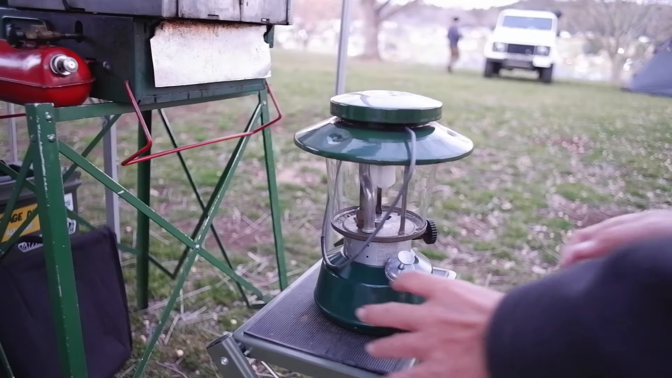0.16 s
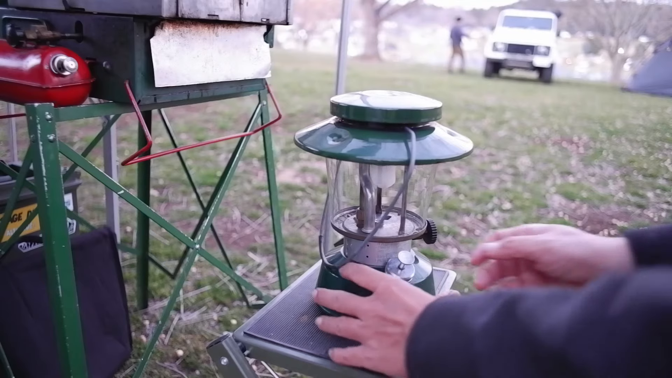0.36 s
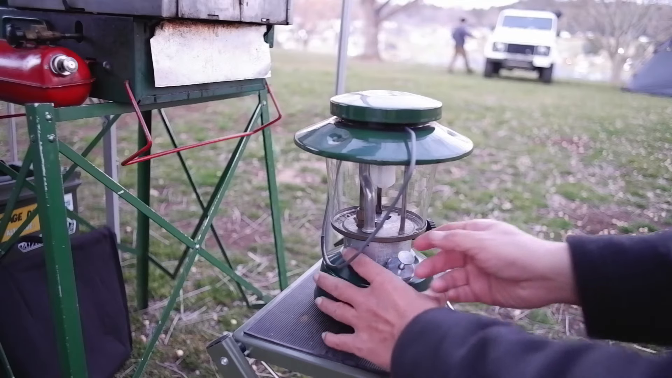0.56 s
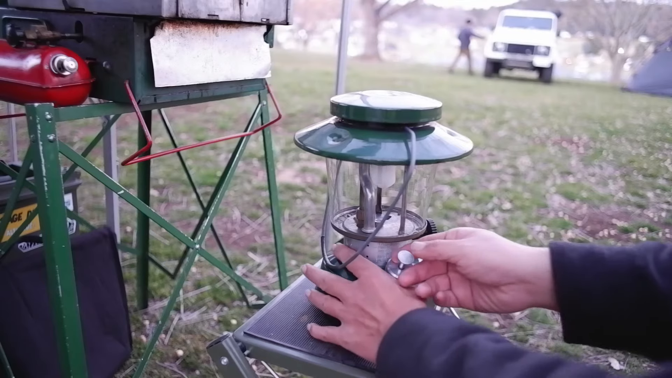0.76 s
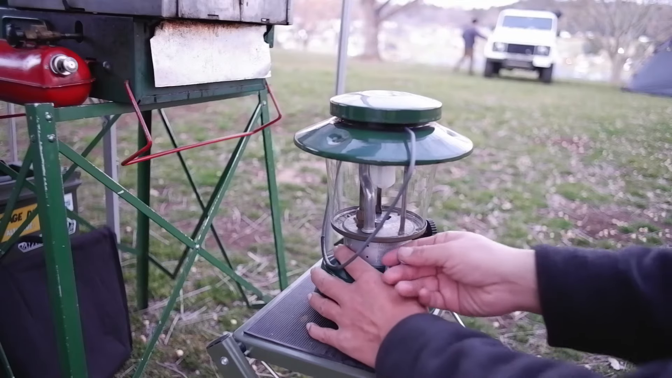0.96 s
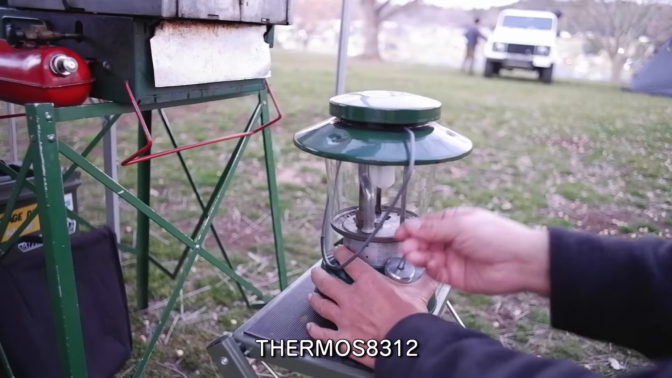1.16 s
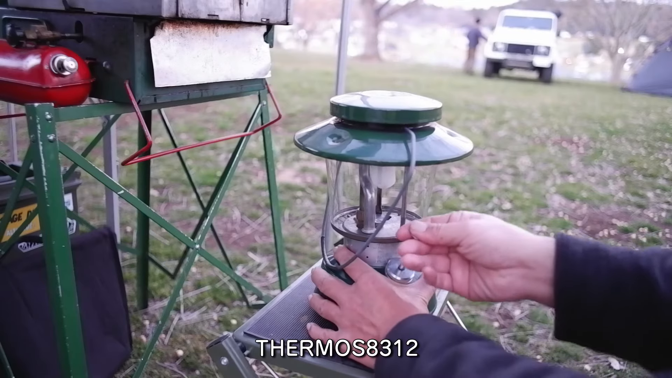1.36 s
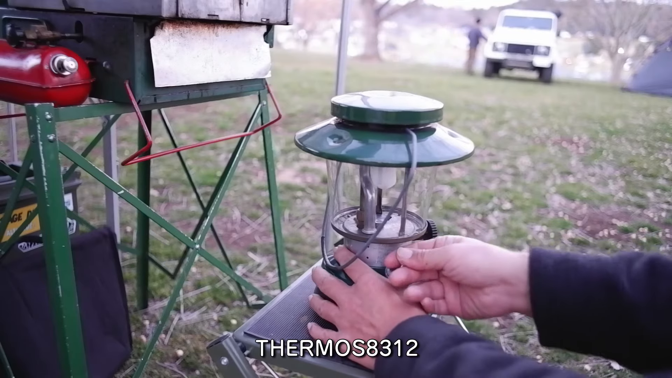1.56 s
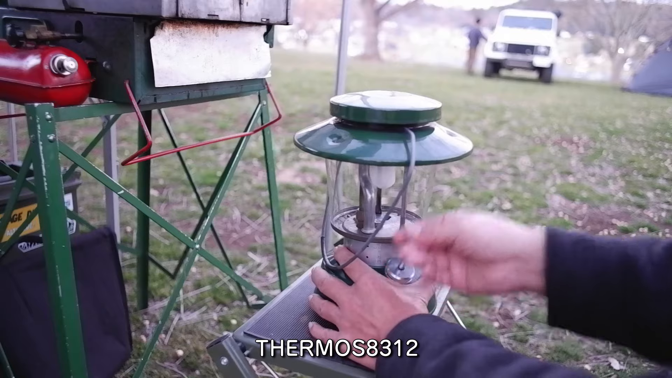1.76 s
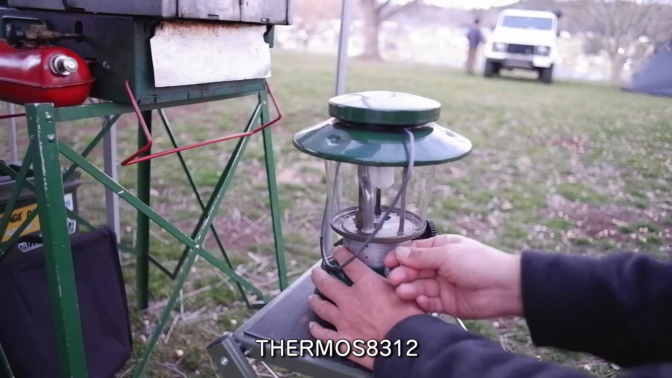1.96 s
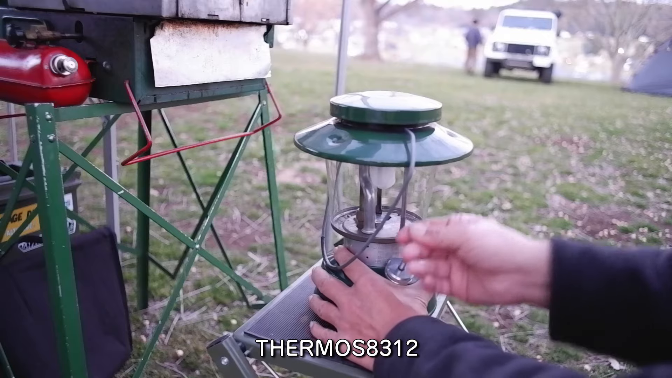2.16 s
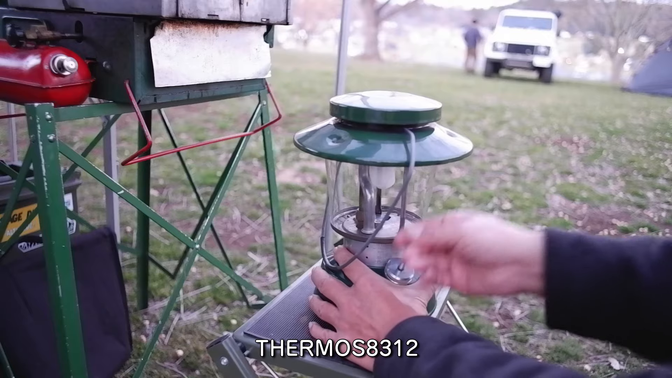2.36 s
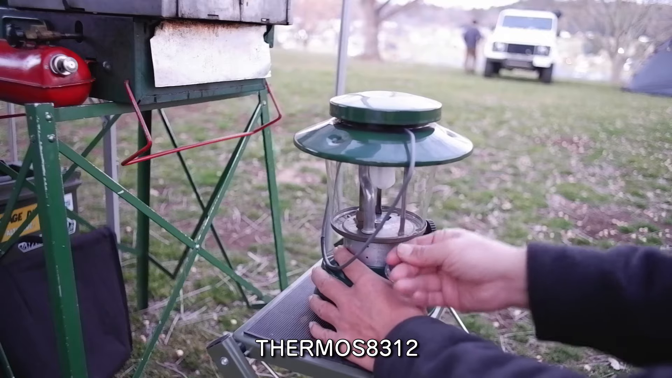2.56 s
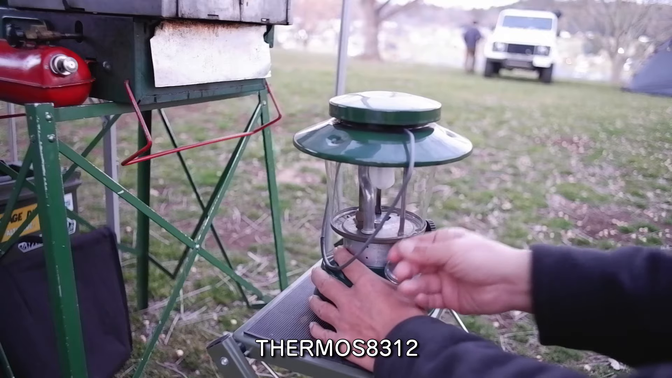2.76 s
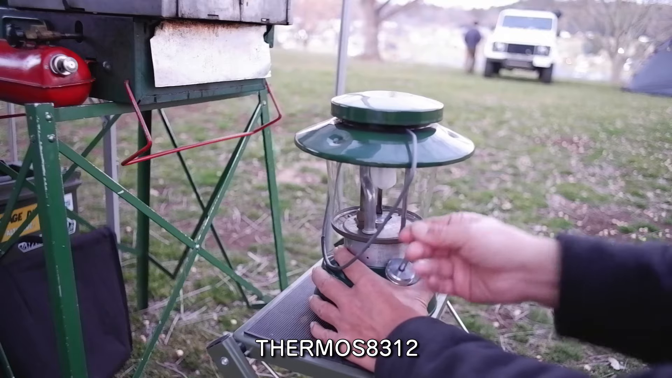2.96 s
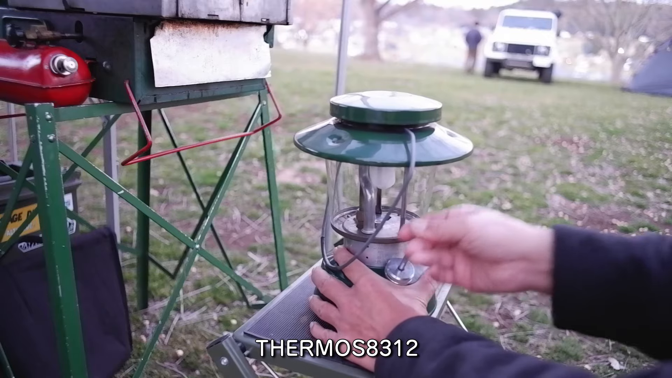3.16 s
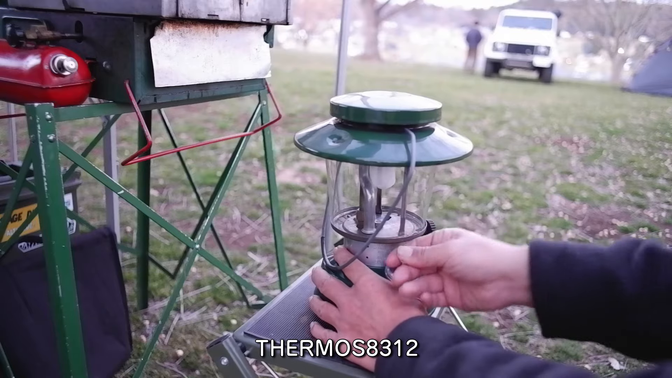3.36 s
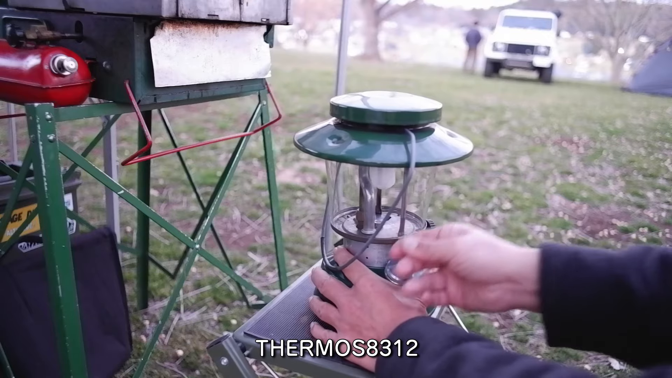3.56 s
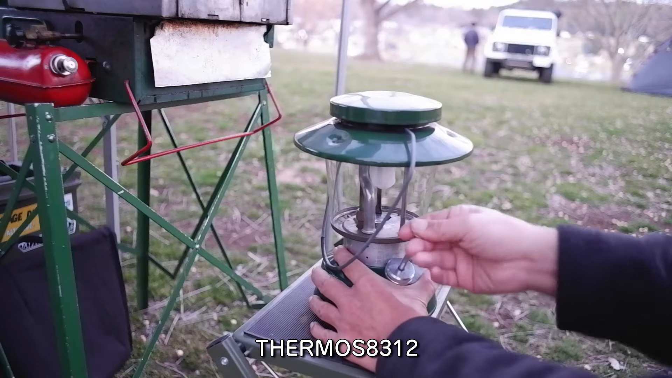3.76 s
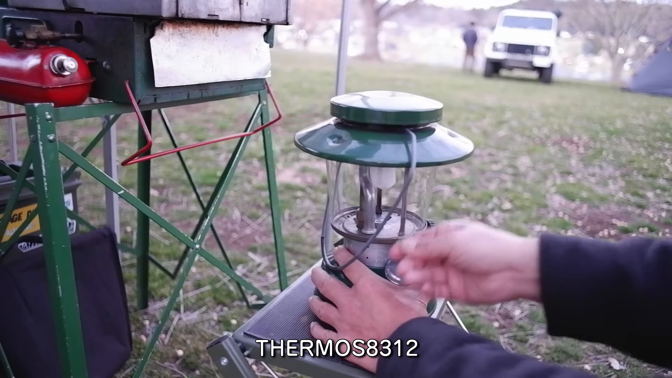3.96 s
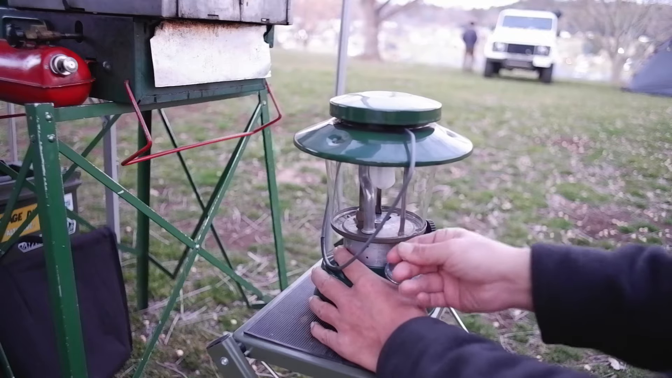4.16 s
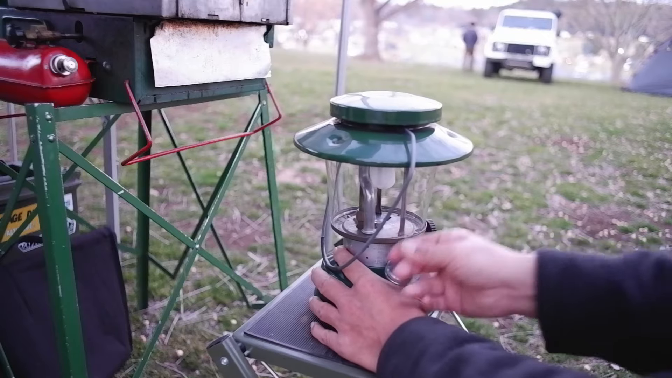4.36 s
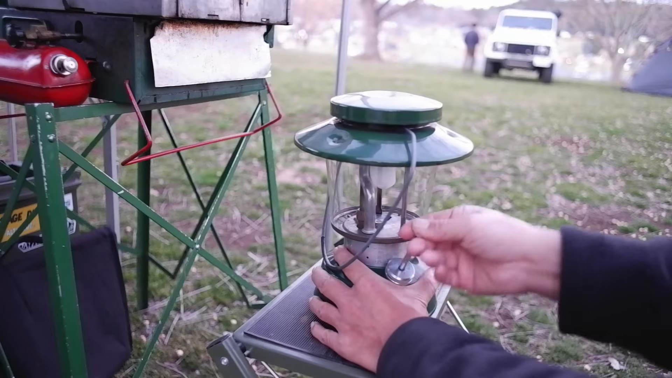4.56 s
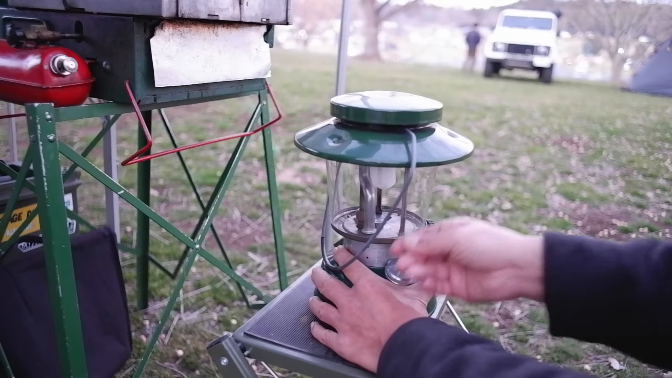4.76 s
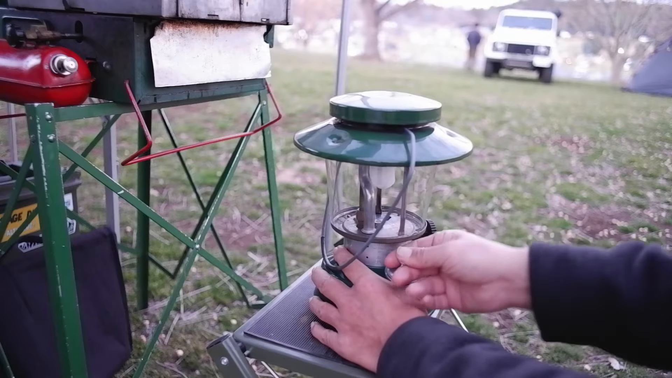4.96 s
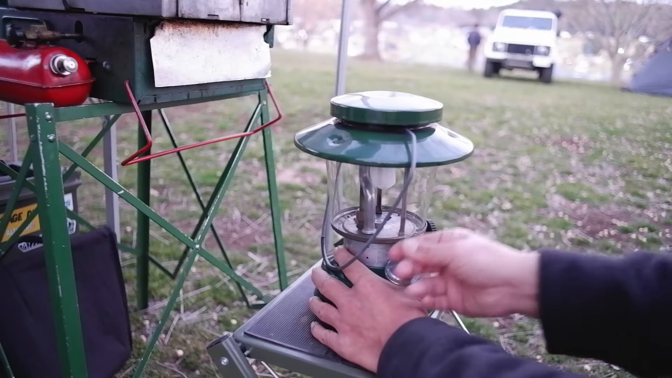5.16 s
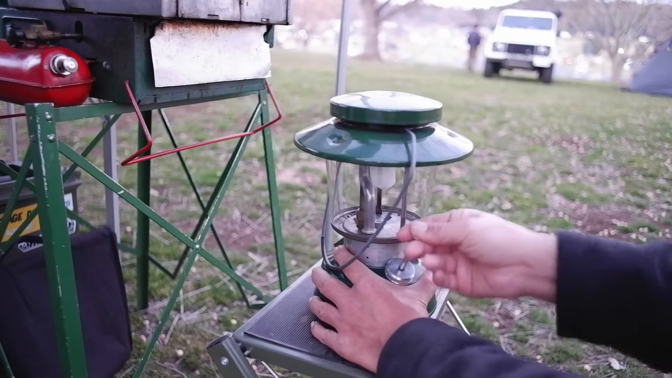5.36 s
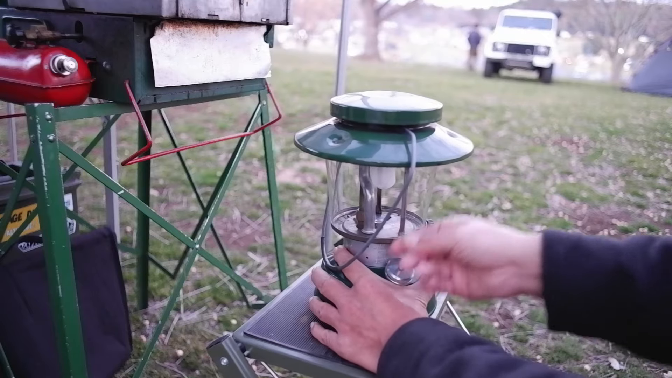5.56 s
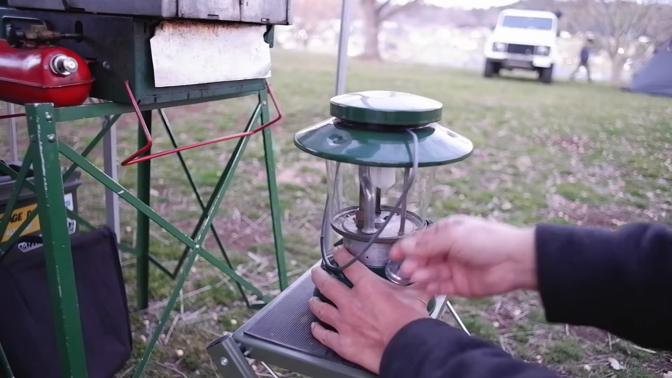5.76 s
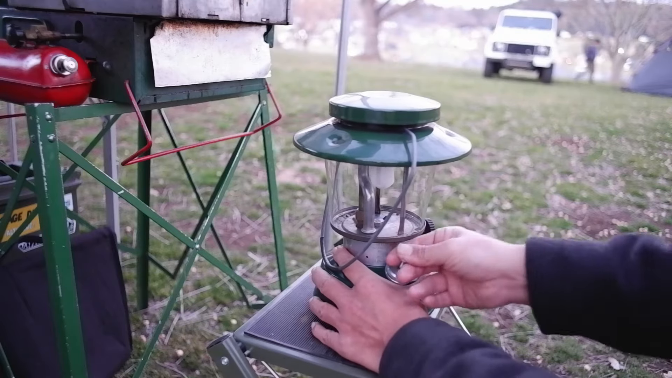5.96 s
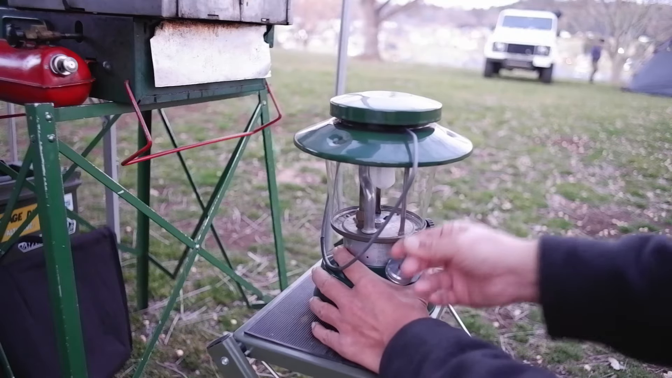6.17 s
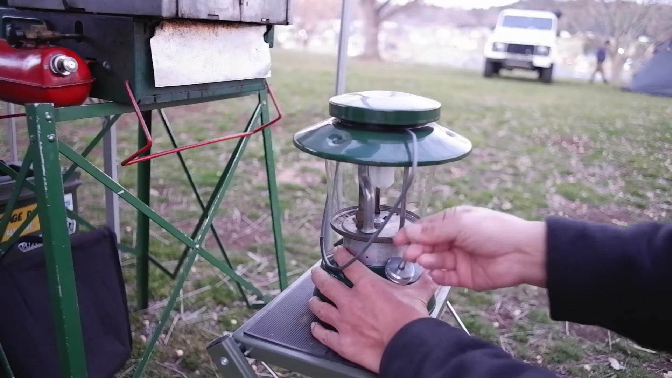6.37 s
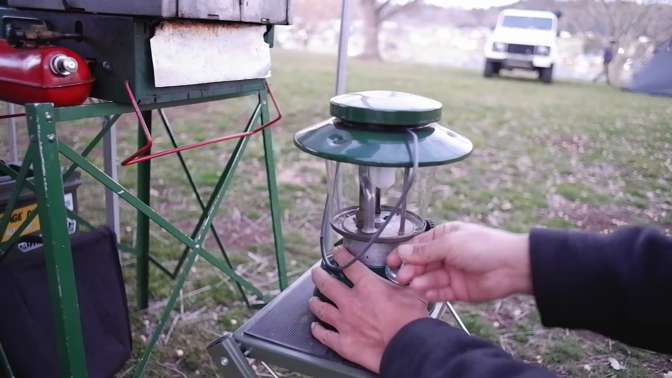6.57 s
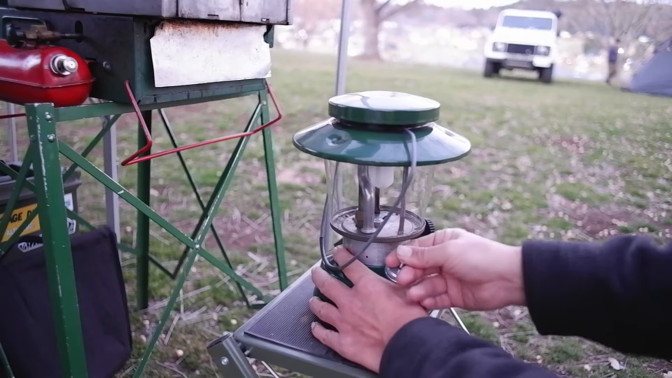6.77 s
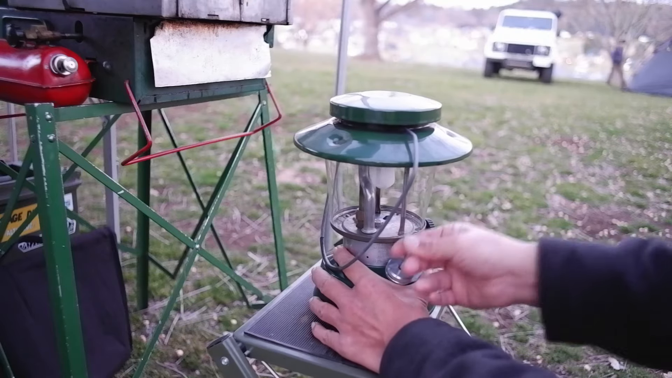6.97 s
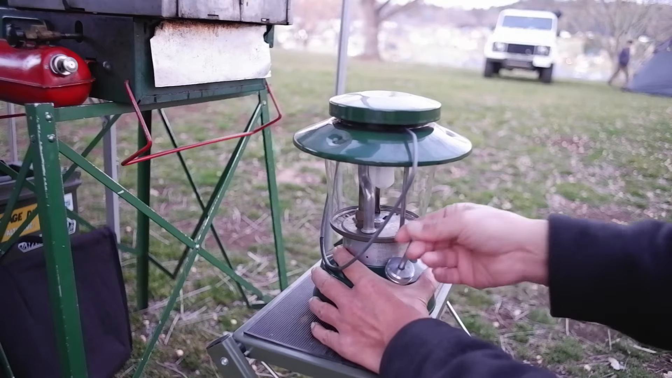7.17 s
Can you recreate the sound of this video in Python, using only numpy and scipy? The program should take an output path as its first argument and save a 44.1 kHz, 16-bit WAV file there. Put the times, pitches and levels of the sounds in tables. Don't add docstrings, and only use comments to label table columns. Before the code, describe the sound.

After soft fumbling and a bright metal tap, a small plunger pump squeaks rapidly about four times a second, rattling and ringing outdoors.

```python
import sys
import numpy as np
from scipy import signal
from scipy.fft import rfft, irfft, next_fast_len
from scipy.io import wavfile
from scipy.ndimage import uniform_filter1d, map_coordinates

SR = 44100
rng = np.random.default_rng(int(sys.argv[2]) if len(sys.argv) > 2 else 0)


def int16_out(signal):
    q = np.round(np.clip(np.atleast_2d(signal).T, -1, 1) * 32767)
    wavfile.write(sys.argv[1], SR, q.astype(np.int16))


def to_linear_factor(level_db):
    exponent = np.asarray(level_db, float) / 20
    return 10 ** exponent


N = 318133


def unit(x):
    return x / np.sqrt(np.mean(x ** 2) + 1e-20)


def at(points, t):
    return np.interp(t, *np.transpose(points))


def along(points, hz):
    f, v = np.transpose(points)
    return np.interp(np.log(hz + 1), np.log(f + 1), v)


def wobble(rate):
    return map_coordinates(rng.standard_normal(int(N * rate / SR) + 4), [np.arange(N) * rate / SR])


def filtered(x, response):
    m = next_fast_len(N + SR // 2)
    return irfft(rfft(x, m) * response(np.fft.rfftfreq(m, 1 / SR)), m)[..., :N]


def spread(pair, alike):
    def turn(hz):
        return np.arccos(np.clip(along(alike, hz), -1, 1)) / 2

    mid, side = filtered(pair, lambda hz: np.array([np.cos(turn(hz)), np.sin(turn(hz))]))
    return np.array([mid + side, mid - side])


def add(track, s, sound):
    part = track[..., round(s * SR):][..., :sound.shape[-1]]
    part += sound[..., :part.shape[-1]]


def fade(t, rise, t60):
    return (1 - np.exp(-(t / rise) ** 2)) * to_linear_factor(-60 * t / t60)


def glide_phase(hz):
    return 2 * np.pi * np.cumsum(hz) / SR + rng.uniform(0, 2 * np.pi)


def ring(modes, t, rise, scatter_db, flutter_db):
    hz, db, t60 = np.transpose(modes)[:, :, None]
    luck = rng.standard_normal((4, len(modes), 1))
    flutter = flutter_db * np.sin(2 * np.pi * 9 * np.exp(.5 * luck[2]) * t + 3 * luck[3])
    strength = to_linear_factor(db + scatter_db * luck[0] + flutter) * fade(t, rise, t60)
    return np.sum(strength * np.sin(2 * np.pi * hz * t + 3 * luck[1]), axis=0)


def swept(slips, modes, t):
    wall = np.zeros(len(t))
    for hz, db, t60 in modes:
        wall += to_linear_factor(db + 1.1 * rng.standard_normal() - 60 * t / t60) * np.sin(2 * np.pi * hz * t)
    voiced = signal.fftconvolve(slips, wall)[:len(t)]
    return voiced / np.abs(voiced).max()


# pitch_hz, level_db per Hz
FIELD_HUSH = [(60, -28), (110, -2), (320, -3), (500, -8.5), (1400, -14.5), (2400, -17.5), (3600, -21),
              (4600, -30), (9000, -30), (16300, -27.5)]
# pitch_hz, likeness 0-1
FIELD_LIKENESS = [(100, .4), (300, .6), (950, .8), (3800, .5), (15000, .1)]
# time_s, level_db
BREEZE_LEVEL = [(0, -78), (.6, -79), (1.2, -75), (1.6, -78), (2.2, -76), (3, -75), (3.6, -73.5), (4.3, -73),
                (4.7, -70), (5.2, -68.5), (5.7, -71.5), (6.1, -79), (6.4, -70.5), (6.8, -76), (7.2, -72)]
# start_s, level_db
SLEEVE_PUFFS = [
    (.305, -60),
    (.73, -65),
    (1.18, -61),
    (1.27, -75),
]
# pitch_hz, likeness 0-1
PUFF_LIKENESS = [(30, .3), (150, .4)]


def field():
    z = signal.stft(rng.standard_normal((2, N)), nperseg=512)[2]
    patches = uniform_filter1d(uniform_filter1d(rng.standard_normal(z.shape[1:]), 6, 0), 14, 1)
    pair = signal.istft(z * to_linear_factor(1.2 * unit(patches)), nperseg=512)[1][:, :N]
    distant = filtered(pair, lambda f: to_linear_factor(along(FIELD_HUSH, f)) / (1 + (140 / (f + 1)) ** 4))
    hush = unit(spread(distant, FIELD_LIKENESS))
    puff = filtered(rng.standard_normal((2, N)), lambda f: (f / 110) / (1 + (f / 150) ** 3.4))
    level = to_linear_factor(at(BREEZE_LEVEL, np.arange(N) / SR) + 5.4 * wobble(4.8))
    t = np.arange(SR // 4) / SR
    jolts = [(s, 0.5 * table_db - 39) for s, _, _, table_db, _ in STROKES]
    for s, db in SLEEVE_PUFFS + jolts:
        add(level, s, to_linear_factor(db) * fade(t, 0.0013, 0.25))
    return to_linear_factor(-64.5) * hush + level * unit(spread(puff, PUFF_LIKENESS))


# time_s, level_db
RUB_PRESSURE = [(0, -58.5), (.26, -71), (.68, -64.5), (1.65, -70), (1.95, -52), (2.1, -46.5), (3.2, -49.5),
                (3.5, -49.5), (5.3, -51), (5.6, -51), (5.9, -48), (7.2, -49)]


def rubbing():
    t, blows = np.arange(N) / SR, np.transpose(STROKES)[0]
    last_blow = blows[np.maximum(np.searchsorted(blows, t) - 1, 0)]
    since = np.where(t > blows[0], t - last_blow, 0)
    ease_db_per_s = 15
    return at(RUB_PRESSURE, t) - ease_db_per_s * since + 4 * wobble(25) + 0.96 * wobble(140)


# start_s, level_db, pitch_hz of the touched part, treble_db over the level
FINGERS = [(0.026, -42.5, 1243, -12), (0.055, -61, 2600, 9), (0.3038, -54, 1084, -28),
           (0.414, -53, 1340, -28), (0.487, -42, 1680, -15), (0.521, -45, 1950, -14),
           (0.542, -43, 1720, -20), (0.5545, -44, 3300, -4.5), (0.561, -56, 955, -20),
           (0.575, -53, 940, -25), (0.611, -44, 2520, -7), (0.855, -39, 1610, -7),
           (0.9184, -48, 1070, -25.5), (0.99, -55, 1310, -11), (1.005, -54, 3780, -13),
           (1.03, -53, 2100, -9), (1.048, -55, 3480, -14), (1.1562, -52, 1260, -23), (1.24, -54, 1160, 0.5),
           (1.261, -39.5, 3790, -7), (1.273, -58, 3600, -14), (1.284, -49, 4240, -7),
           (1.31, -47.5, 1150, -3), (1.3455, -48, 2026, 4), (1.36, -42.5, 3800, 6.5),
           (1.372, -49, 4400, -12), (1.398, -61, 4280, -11), (1.41, -57, 3600, -15),
           (1.3855, -51, 3890, 3.5126), (1.4494, -57, 1400, -4), (1.5167, -55.5, 1570, 1.5)]
# start_s, level_db, pitch_hz, treble_db
CAP_TAP = [
    (0.6933, -15, 6420, 0.04),
]
# start_s, level_db, pitch_hz, treble_db
ROD_TICKS = [(1.8696, -58, 1166, 8), (1.9163, -40, 4360, -3), (1.9304, -41.5, 5540, -1),
             (1.953, -33.5, 4150, -2), (1.9655, -34, 4500, 2), (2.2623, -30, 3990, -2.5),
             (2.526, -41, 6000, 4), (2.5526, -30.5, 3480, -10), (2.787, -54, 1250, 16),
             (2.818, -27, 4350, 1.5), (2.859, -31, 2450, -4.5), (3.083, -29, 1540, -1),
             (3.124, -27, 6440, -10), (3.34, -35.5, 3780, 0.5), (3.3788, -34, 3000, -5),
             (3.6, -38, 4040, -6), (3.628, -36.5, 2980, 0), (3.664, -39.5, 1720, -27),
             (3.928, -36.5, 4120, 0.5), (4.205, -44, 3020, 3.5), (4.44, -38.5, 3650, -3),
             (4.718, -38, 3830, -1), (4.986, -41, 3670, 3), (5.2187, -38.5, 4250, 2),
             (5.252, -43, 3860, 9.5), (5.443, -59, 5960, 5), (5.487, -45.5, 4100, 3),
             (5.546, -54, 5800, 4.5), (6.0005, -36, 2970, 4), (6.241, -45, 4100, 6),
             (6.274, -39.5, 4030, 6), (6.769, -42, 3960, 7)]
# start_s, level_db, treble_db over the level,
# tank_knock_db
REBOUNDS = [(1.725, -9.5, -3.5, -9), (2.0984, -10, -2.5, -7), (2.3905, -24, -10, -19),
            (3.198, -28.5, 2, -35), (3.749, -39, -7, -40), (4.022, -30, 9, -28), (4.0503, -26.5, 0.5, -40),
            (4.563, -15.5, -4.5, -25), (5.0881, -13.5, 3, -6.5), (5.356, -23.5, 4, -36),
            (5.3883, -32.5, 6, -51), (5.6323, -14.5, -1, -25), (5.813, -25, -5, -20),
            (5.8281, -15, -1.5, -20), (6.079, -32, -3.5, -27), (6.099, -30, -8, -31),
            (6.379, -11, 0.5, -12), (6.428, -32, 4.5, -38), (6.6474, -10.5, -1, -11),
            (6.8985, -19.5, 5, -29), (6.907, -34, -14, -16.5), (6.954, -33.5, 9, -45),
            (6.973, -25.5, 1.5, -44), (7.177, -24, -2, -20)]
# start_s, level_db
LEAD_INS = [(2.633, -14), (3.162, -14.5), (3.702, -27), (4.247, -20), (5.302, -34), (5.767, -22.5),
            (6.035, -21.5), (6.312, -24), (6.574, -29.5), (6.593, -32), (6.829, -39), (6.846, -34.5),
            (7.079, -31.5), (7.131, -26)]


def contacts():
    rows = [(s, db - 14.5, db, db + treble_db, .0006, 0.069) for s, db, treble_db, _ in REBOUNDS]
    rows += [(s, db - 3.5, db, db, 0.012, 0.16) for s, db in LEAD_INS]
    low_hz, middle_hz = 1400, 2600
    low_db_per_octave, middle_db_per_octave = 6.5, -1
    for ticks, t60 in ((FINGERS, 0.13), (CAP_TAP, 0.15), (ROD_TICKS, 0.12)):
        for s, db, hz, treble_db in ticks:
            low_db = db - low_db_per_octave * max(np.log2(hz / low_hz), 0)
            middle_db = db - middle_db_per_octave * max(np.log2(middle_hz / hz), 0)
            rows.append((s, low_db, middle_db, db + treble_db, .001, t60))
    return rows


# pitch_hz, width_hz, level_db
LANTERN_PEAKS = [(1305, 224, 1.5), (1720, 34, 14), (1950, 6, -11.5), (2333, 330, 1.5), (2818, 35, -5.5),
                 (3480, 48, 13.5), (3723, 105, -8.5), (4156, 28.6, 12), (4800, 9.2, -5), (5150, 340, -1),
                 (5796, 63, -2.5), (6070, 140, 5), (6365, 36, -2), (6700, 30, -12), (7460, 38, -16),
                 (8120, 93, -9)]


def lantern_body(hz):
    response = .5
    for k, (centre, width, db) in enumerate(LANTERN_PEAKS):
        damped = 1j * hz * width
        response = response + (-1) ** k * 0.8 * to_linear_factor(0.48 * db) * damped / (centre ** 2 - hz ** 2 + damped)
    return response


# pitch_hz, level_db per Hz
RATTLE_COLOUR = [(200, -29), (300, -18.5), (500, 4.5), (660, 2.5), (1080, 1.5), (1270, 1), (1470, -3.5),
                 (2210, -5.5), (3580, -10), (4460, -11.5), (6320, -9), (15400, -37), (16300, -75)]
# rise_s, t60_s, treble_db, top_db, squeak_length_factor
SHAKES = [(.003, 0.21, -4.5, -3.5, 1.21), (.004, 0.11, -6.5, -6, 1.3), (.004, 0.14, -2.5, -7, 0.944),
          (.005, 0.095, -2, 0, 1.1), (.004, 0.13, -3, -3, 1.13), (.006, 0.069, -2.5, -2, 1.03),
          (.004, 0.11, -0.5, -3, 1.024), (.005, .12, -2, -2, 1.074), (.004, .13, 0.5, -5, 1.098),
          (.005, 0.097, 0, -0.5, 1.004), (.004, 0.16, 1.5, -4.5, 1.043), (.005, .12, 0.5, -1, 1.034),
          (.005, 0.12, -1.5, -4, 1), (.005, 0.11, -0.5, -3, 0.932), (.005, .12, -0.5, -4.5, 1),
          (.007, 0.14, 1, -6, 1.2), (.007, .13, -2, -2.5, 1.3), (.007, 0.14, -2, -7, 1.2),
          (.007, 0.097, 0, -6, 1), (.007, 0.15, -2, -2, 1.1), (.007, 0.11, -1, -3, 0.91)]
LINGER = [
    [-28],
    [-29],
    [-33],
    [-38],
]
RUB = [
    [-12],
    [-10.5],
    [-19],
    [-14],
]


def rattle():
    drive, t = np.zeros((4, N)), np.arange(SR // 4) / SR
    lasting = np.array([[1.15], [1.02], [.95], [.72]])
    rises = np.array([[1.2], [.95], [1.15], [.9]])
    for (s, _, db, *_), (rise, t60, treble_db, top_db, _), (*_, low_db) in zip(STROKES, SHAKES, HOLDS):
        linger = to_linear_factor(LINGER) * fade(t, 0.035, 0.28 * lasting)
        registers_db = np.array([[low_db], [1.5], [treble_db], [top_db]])
        add(drive, s + 0.000099, to_linear_factor(db + registers_db) * (fade(t, rise * rises, t60 * lasting) + linger))
        add(drive, s - .005, to_linear_factor(db - 32 + 1.8 * s) * fade(t, .003, .035 * lasting))
    for s, *levels_db, rise, t60 in contacts():
        registers_db = np.append(levels_db, levels_db[-1] - 0.5)[:, None]
        snap = to_linear_factor(3) * fade(t, rise, .012)
        add(drive, s - .0008, to_linear_factor(registers_db - 12) * (fade(t, rise, t60 * lasting) + snap))
    drive = np.hypot(drive, to_linear_factor(rubbing() + np.array(RUB)))

    chatter = to_linear_factor(.7 * wobble(180) + 2.2 * wobble(900))
    noise = rng.standard_normal((2, N)) * unit(chatter)

    def registers(f):
        low = 1 / (1 + (f / 2000) ** 6)
        high = 1 - 1 / (1 + (f / 5000) ** 8)
        top = 1 - 1 / (1 + (f / 8600) ** 10)
        return np.array([low, 1 - low - high, high - top, top])[:, None] * to_linear_factor(along(RATTLE_COLOUR, f))

    sources = filtered(noise, registers)
    sources = sources / sources.std(axis=(1, 2))[[0, 1, 2, 2], None, None]
    out = np.zeros((2, N))
    for gain, source, spike_db in zip(drive, sources, (.6, 1.8, 1.9, 2.1)):
        out += gain * source * to_linear_factor(spike_db * wobble(350))
    return to_linear_factor(3.0) * filtered(out, lantern_body)


# pitch_ratio, level_db
CLOSE_NOTES = [(.93, -9), (1, 0), (1.045, -8), (1.11, -10)]


def touched_parts():
    out, t = np.zeros(N), np.arange(SR // 10) / SR
    for ticks, note_db in ((FINGERS + CAP_TAP, -7), (ROD_TICKS, -11)):
        for s, db, hz, treble_db in ticks:
            notes = [(hz * ratio, level, 0.11) for ratio, level in CLOSE_NOTES]
            note = ring(notes, t, rise=0.0028, scatter_db=0.5, flutter_db=-2.5)
            add(out, s, to_linear_factor(db + max(treble_db, 0) + note_db) * note)
    return out


# start_s, level_db
KNUCKLES = [
    (0.028, -31),
    (.05, -41),
    (0.305, -49),
    (1.162, -56.5),
    (5.547, -46),
    (5.771, -49),
    (6.196, -34),
    (6.287, -49),
    (6.567, -48),
]


def knuckles():
    out, t = np.zeros(N), np.arange(SR // 4) / SR
    damped = [(hz, level, 0.04 * t60) for hz, level, t60 in TABLE_MODES + TANK_MODES]
    for s, db in KNUCKLES:
        add(out, s, to_linear_factor(db) * ring(damped, t, rise=0.00052, scatter_db=-2.0, flutter_db=-7.0))
    return out


# pitch_hz, level_db, t60_s
CAP_MODES = [(587, -25, 1.1), (926, -23, 0.5), (1319, -27, 0.5), (1588, -9, 0.1), (2120, -27, .3),
             (3483, -12, 0.17), (3740, -13, .13), (4188, -19, 0.19), (4667, -13, 0.18), (5130, -29, 0.3),
             (5701, -11, 0.19), (5846, -23, 0.33), (6126, -4, 0.11), (6288, 0, 0.19), (6944, -27, 0.36),
             (8156, -22, 0.31)]
# start_s, level_db
CAP_BRUSHES = [
    (.52, -62.5),
    (0.552, -62),
]


def vent_cap():
    out, t = np.zeros(N), np.arange(SR * 3 // 4) / SR
    lowest = [(hz, 0, .6 * t60) for hz, _, t60 in CAP_MODES[:3]]
    for s, db in CAP_BRUSHES:
        add(out, s, to_linear_factor(db) * ring(lowest, t, rise=.004, scatter_db=1.5, flutter_db=2.5))
    for s, db, *_ in CAP_TAP:
        add(out, s, to_linear_factor(db - 11) * ring(CAP_MODES, t, rise=.003, scatter_db=.6, flutter_db=2.5))
    return out


# start_s, squeak_db, rattle_db, table_db, barrel_db
STROKES = [(1.654, -2, -23.5, -20.5, -25.5), (2.065, 0, -12, -21.5, -29), (2.361, -1.5, -16, -20.5, -40),
           (2.645, -1, -17.5, -21, -27.5), (2.905, -0.5, -17.5, -21, -27.5), (3.175, -1, -13, -30.5, -29),
           (3.44, 0.5, -15, -21.5, -28), (3.722, 0, -15, -22.5, -28.5), (3.991, 0, -17, -21.5, -28),
           (4.26, -0.5, -14, -29, -26.5), (4.516, 0, -17.5, -21.5, -28), (4.788, -0.5, -15.5, -25, -26.5),
           (5.049, -0.5, -15, -24.5, -63), (5.319, -3.5, -14.5, -27, -35), (5.584, 0, -14.5, -24.5, -46),
           (5.785, -4.5, -14, -29, -25.5), (6.067, -0.5, -14, -37, -21.5), (6.338, -1.5, -13.5, -31, -26),
           (6.612, -1, -14, -28, -22.5), (6.874, -2, -13, -29, -29), (7.143, 0, -13, -34, -17)]
# time_s, time_constant_s, first_pitch_hz
GLIDE = [
    (1.601, 0.0051, 1752),
    (2.502, .0066, 1900),
    (3.2, 0.0053, 1836),
    (5.602, .0067, 1906),
    (5.796, .011, 2061),
    (6.301, 0.0105, 2158),
    (7.2, 0.0105, 2107),
]
# time_s, firmness 0-1
GRIP = [
    (5.7, 0),
    (5.75, 1),
]
# low_modes_db, upper_modes_db, ring_length_factor, low_rattle_db
HOLDS = [(-0.5, -5.5, 1, -4.5), (-2.5, -0.5, 1, -2), (-2, -9, 1, -1), (-1.5, -1.5, 1, 0), (-2, 0.5, 1, -3),
         (-0.5, 4, 1, -1), (-1, 4.5, 1, -1.5), (-1, 2.5, 1, -5), (-0.5, 1, 1, -2.5), (0.5, 1, 1, -2.5),
         (0.5, -1, 1, -3.5), (1.5, -6, 1, -4), (1.5, -3, .9, -5), (9, -8, 1, -3.5), (3.5, -3, 0.95, -4),
         (10.5, -2, 1, -4.5), (3.5, 0, 1, -7), (6.5, 11.5, 0.87, -6.5), (4, 3.5, 1, -5), (6, 0, 1, -5),
         (3, 2.5, 0.87, -7)]
# pitch_hz, level_db, t60_s
TANK_MODES = [(560, -21.5, 0.032), (891, -5, 0.013), (1267.8, 0, 0.035), (1765, -10.5, 0.045),
              (2333, -11.5, 0.05)]


def tank_squeak():
    out, t = np.zeros(N), np.arange(SR // 10) / SR
    times, taus, firsts = np.transpose(GLIDE)
    for (s, db, *_), (*_, longer), (low_db, upper_db, ringing, _) in zip(STROKES, SHAKES, HOLDS):
        tau = longer * np.interp(s, times, taus) / 1.8
        end = 336.4 + 208 * at(GRIP, s)
        above = np.interp(s, times, firsts) - end
        cross = tau * np.log(above / (1260 - end))
        phase = glide_phase(end + above * np.exp(-t / tau))
        swell = t / cross / 1.15
        force = swell ** 2.2 * np.exp(-2.2 * (swell - 1)) + .35 * fade(t, cross * 1.5, 3.6 * tau)
        slips = force * (np.sin(phase) + 0.78 * np.sin(2 * phase + 3.5))
        hold_db = (low_db, low_db, 0, upper_db, upper_db / 2)
        held = [(hz, level + more, ringing * t60) for (hz, level, t60), more in zip(TANK_MODES, hold_db)]
        add(out, s + 0.00064 - cross, to_linear_factor(db - 3.25) * (swept(slips, held, t) + to_linear_factor(-48) * slips))
    return out


# barrel_end_hz, lower_globe_note_db, upper_globe_note_db
TAILS = [(1285, -59, -64), (1280, -54, -58), (1290, -59, -62), (1290, -66, -67), (1290, -64, -57),
         (1290, -66, -57), (1280, -58, -63), (1280, -55, -58), (1260, -59, -57), (1260, -62, -66),
         (1290, -61, -60), (1360, -56, -64), (1330, -57, -59), (1340, -60, -59), (1290, -62, -61),
         (1400, -63, -67), (1410, -61, -62), (1395, -64, -55), (1400, -63, -55), (1340, -55, -60),
         (1330, -60, -60)]


def barrel():
    out, t = np.zeros(N), np.arange(SR // 3) / SR
    waver = to_linear_factor(2.5 * wobble(40))
    start_hz, rise_s = 1262, 0.05
    for (s, *_, db), (end_hz, *_) in zip(STROKES, TAILS):
        hz = end_hz - (end_hz - start_hz) * np.exp(-(t / rise_s) ** 1.7)
        add(out, s + 0.003065, to_linear_factor(db) * fade(t, 0.0086, 0.26) * np.sin(glide_phase(hz)))
    return out * waver


# pitch_hz, level_db, t60_s
METAL_MODES = [(745, -5, 0.22), (905, -15, 0.3), (1230, -9, 0.17), (1700, -11, 0.35), (1986, -12, 0.3),
               (2293, -9, 0.21), (2730, -13, 0.3), (3887, -15, 0.35), (4183, -9, 0.32), (4544, -15, 0.22),
               (4807, -11, 0.4), (4931, -16, 0.4), (5841, -8, 0.5), (6164, -6, 0.18), (6300, -9, 0.28),
               (6944, -14, 0.5), (8010, -25, .25)]
# first_hz, second_hz, t60_s, level_db under the squeak
SQUEAK_PAIRS = [(582, 552, 0.68, -44), (3480, 3500, 0.28, -36)]
# first_hz, second_hz, t60_s, level_db over the level left after 0.14 s
GLOBE_PAIRS = [(2120, 2138, 0.5, 16), (3016, 3026, 1.2, 8.5)]


def globe_and_frame():
    out, t = np.zeros(N), np.arange(SR // 2) / SR
    for (s, squeak_db, db, *_), (*_, lower_db, upper_db) in zip(STROKES, TAILS):
        add(out, s + .003, to_linear_factor(db - 23.5) * ring(METAL_MODES, t, rise=0.004, scatter_db=2.5, flutter_db=4.0))
        levels_db = (squeak_db - 8 * at(GRIP, s), squeak_db, lower_db, upper_db)
        pairs = []
        for base, (first, second, t60, level) in zip(levels_db, SQUEAK_PAIRS + GLOBE_PAIRS):
            pairs += [(first, base + level - .8, t60), (second, base + level - 11, t60)]
        add(out, s + 0.00305, ring(pairs, t, rise=0.0016, scatter_db=1.2, flutter_db=2.0))
    return out


# pitch_hz, level_db, t60_s
TABLE_MODES = [(278, -26, 0.025), (358, -0.5, 0.13), (421, 16, 0.032), (461.4, -0.5, 0.15), (554, 6, 0.13)]
# end_hz, glide_s, lasts_s, bare_slips_db
GROANS = [(392, 0.0171, 0.0362, -9), (276.1, 0.013, 0.06, -15), (413, 0.0102, 0.037, -10),
          (404, 0.0066, 0.033, -19), (427, 0.00695, 0.031, -8), (468, 0.00656, 0.021, -1),
          (379, 0.0114, 0.038, -8), (430, 0.01056, 0.037, -13.5), (436, 0.0072, 0.041, -13.5),
          (520, 0.00774, 0.035, -18), (325, 0.021, 0.06, -0.5), (440, .01, 0.04, -11.5),
          (315, 0.019, 0.036, 6), (419, 0.0171, 0.037, -5), (429, 0.0197, 0.062, -3),
          (509, 0.0208, 0.049, -15), (528, .02, 0.068, -5), (479, .022, 0.12, -11),
          (552, 0.0186, 0.045, -15), (518, 0.0204, .045, 7), (508, 0.0198, 0.084, 5)]


def table_groan():
    out, t = np.zeros(N), np.arange(SR // 4) / SR
    stutter = to_linear_factor(3.5 * wobble(120))
    start_hz = 854
    for (s, _, _, db, _), (end_hz, glide_s, lasts_s, bare_db) in zip(STROKES, GROANS):
        phase = glide_phase(end_hz + (start_hz - end_hz) * np.exp(-t / glide_s))
        force = fade(t, 0.0031, 0.25) / (1 + np.exp(np.minimum((t - lasts_s) / 0.012, 50)))
        force = force * np.roll(stutter, -round(s * SR))[:len(t)]
        smooth = uniform_filter1d(uniform_filter1d(rng.standard_normal(len(t)), size=30), size=30)
        scatter = unit(np.gradient(smooth))
        bare = to_linear_factor(bare_db) * force * fade(t, 0.0059, 0.37) * np.sin(phase)
        groan = swept(force * (np.sin(phase) + .45 * scatter), TABLE_MODES, t)
        add(out, s + 0.00365, to_linear_factor(db + 1.4) * (groan + bare))
    return out


def rebound_knocks():
    out, t = np.zeros(N), np.arange(SR // 10) / SR
    unloaded = [(hz * 1.025, level, 1.17 * t60) for hz, level, t60 in TANK_MODES[1:4]]
    for s, *_, db in REBOUNDS:
        add(out, s, to_linear_factor(db) * ring(unloaded, t, rise=0.0052, scatter_db=5.5, flutter_db=7.5))
    return out


# pitch_hz, likeness 0-1
LANTERN_LIKENESS = [(300, .93), (1200, .985), (3000, .95), (5600, .87), (9000, .5), (14000, .3)]


def scene():
    solid = touched_parts() + knuckles() + vent_cap() + tank_squeak() + barrel()
    solid += globe_and_frame() + table_groan() + rebound_knocks()
    other_path = np.pad(solid, (37, 0))[:N]
    lantern = filtered(rattle() + [solid, other_path], lambda f: 1 / (1 + (190 / (f + 1)) ** 6))
    return spread(lantern, LANTERN_LIKENESS) * to_linear_factor([[-.4], [.4]]) + field()


def top_cut(x):
    return signal.sosfilt(signal.butter(12, 16460, fs=SR, output="sos"), x)


def record(dry):
    rounded = dry / (1 + np.abs(dry / .95) ** 8) ** (1 / 8)
    mix = filtered(rounded, lambda hz: hz < 16400)
    return top_cut(mix)


dry = scene()
out = record(dry)
int16_out(out)
```